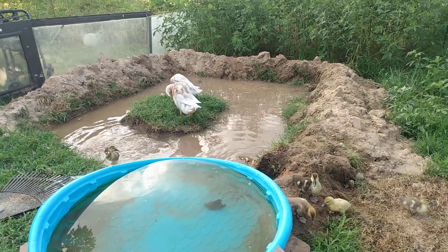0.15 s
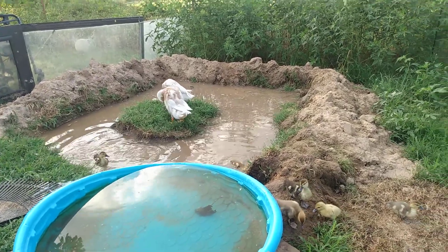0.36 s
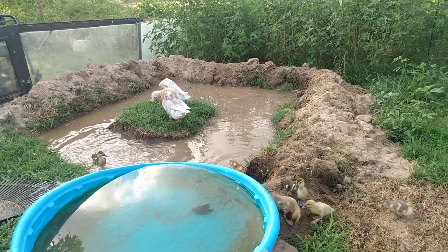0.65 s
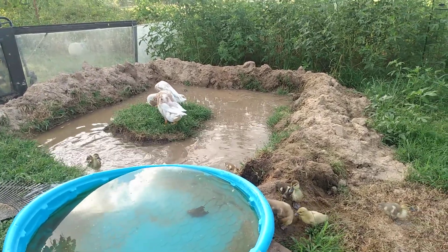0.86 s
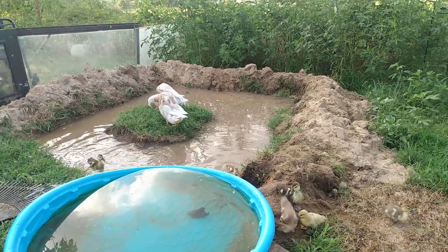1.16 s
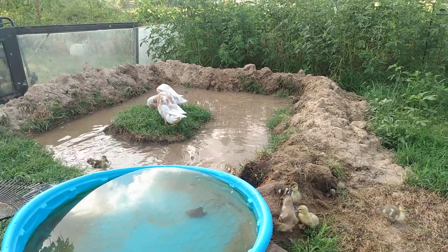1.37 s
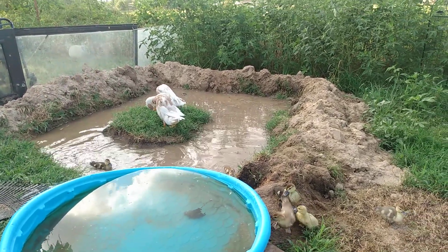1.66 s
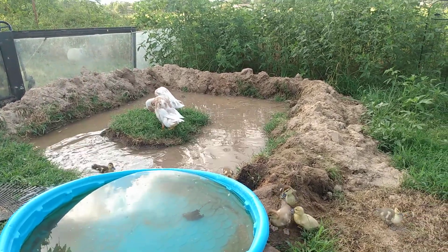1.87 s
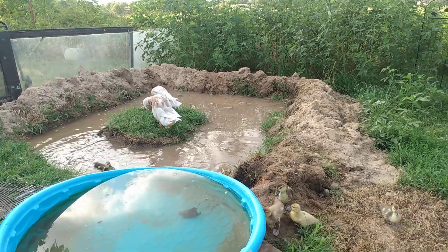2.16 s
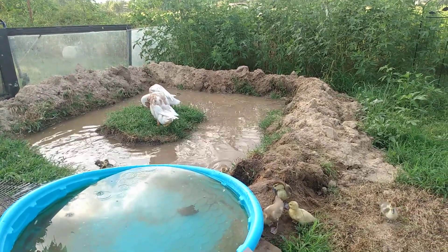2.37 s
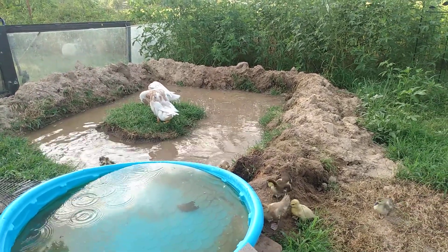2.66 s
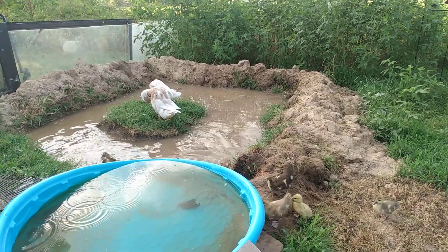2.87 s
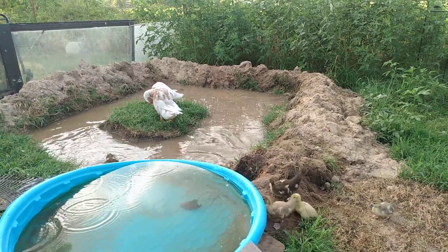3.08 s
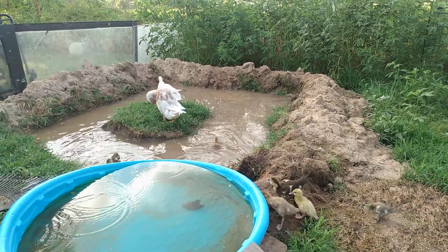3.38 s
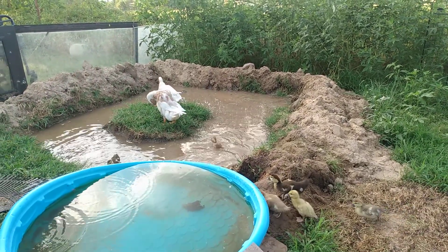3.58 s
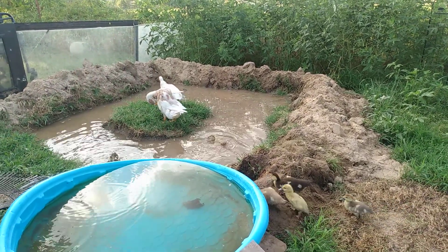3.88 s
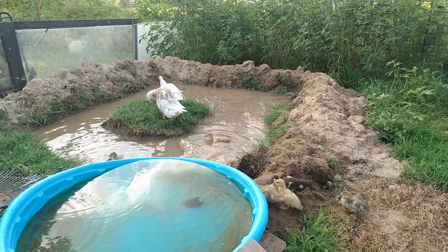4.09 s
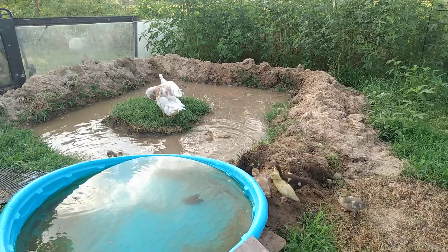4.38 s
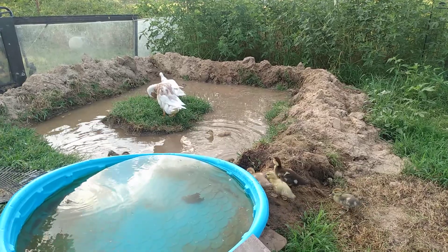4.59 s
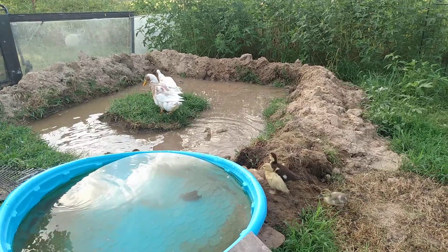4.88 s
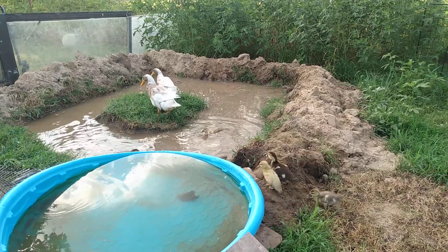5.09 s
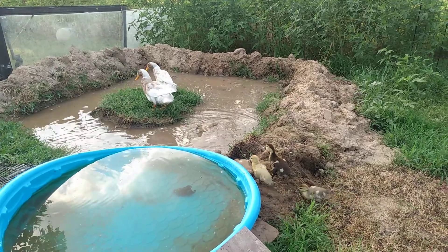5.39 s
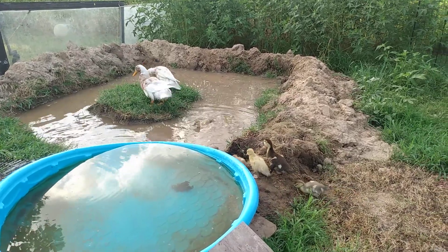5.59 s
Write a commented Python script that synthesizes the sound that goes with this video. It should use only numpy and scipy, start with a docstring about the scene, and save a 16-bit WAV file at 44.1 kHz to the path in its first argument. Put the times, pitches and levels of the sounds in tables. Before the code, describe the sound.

Ducklings dabble and peep softly in a dripping pond, with one close splash, a gusty rumble and crickets scraping nearby.

```python
"""A muddy backyard duck pond, heard on a small handheld stereo microphone.
Bubbles crackle, drip and gurgle under dabbling bills to the left, over a gusty low rumble and
a thin hiss of leaves. The water slops about and splashes once close by, with big ringing plops.
The hand bumps the case, two bush crickets scrape their wings in the weeds, and ducklings
whistle short peeps."""
import sys
import numpy as np
from scipy import signal
from scipy.fft import rfft, irfft
from scipy.io import wavfile
from scipy.ndimage import uniform_filter1d

SR = 44100
rng = np.random.default_rng(int(sys.argv[2]) if len(sys.argv) > 2 else 0)


def master_out(mix):
    """Clip the mix to full scale and print it as 16-bit PCM to the path in sys.argv[1]."""
    frames = np.transpose(np.atleast_2d(mix))
    ceiling = np.clip(frames, -1, 1)
    pcm = np.round(ceiling * 32767).astype(np.int16)
    wavfile.write(sys.argv[1], SR, pcm)


N = 253134
TIME = np.arange(N) / SR
HZ = np.fft.rfftfreq(N, 1 / SR)


def gain_of(db):
    """Decibels to amplitude."""
    return 10 ** (np.asarray(db) / 20)


def unit_rms(x):
    """Scales to an rms of one."""
    return x / np.sqrt(np.mean(x ** 2) + 1e-20)


def fader(curve):
    """A curve of (time [s], level [dB]) as a gain for every sample."""
    return gain_of(np.interp(TIME, *np.transpose(curve)))


def eq(x, curve):
    """Filters by a curve of (frequency [Hz], gain [dB])."""
    hz, db = np.transpose(curve)
    return irfft(rfft(x) * gain_of(np.interp(np.log(HZ + 1), np.log(hz + 1), db)), N)


def noise(spectrum):
    """Noise with a given spectrum in dB per Hz."""
    return eq(rng.standard_normal(N) * np.sqrt(SR / 2), spectrum)


def wander(rate_hz):
    """Smooth random drift of rms one."""
    return unit_rms(irfft(rfft(rng.standard_normal(N)) * np.exp(-(HZ / rate_hz) ** 2), N))


def resonance(f, hz, width):
    """Gain of a steep-sided resonance at the frequencies f."""
    return 1 / (1 + ((f - hz) / width) ** 2 * 2) ** 1.5


def band_drift(x, depth_db):
    """Lets every narrow band swell and sink on its own."""
    bands = signal.stft(x, nperseg=1024, noverlap=768)[2]
    drift = uniform_filter1d(rng.standard_normal(bands.shape[1:]), size=5, axis=0)
    drift = unit_rms(uniform_filter1d(drift, size=14, axis=1))
    return signal.istft(bands * gain_of(depth_db * drift), nperseg=1024, noverlap=768)[1][:, :N]


def add(mix, s, sound):
    """Lays a sound into the mix at s seconds."""
    part = mix[..., max(round(s * SR), 0):][..., :sound.shape[-1]]
    part += sound[..., :part.shape[-1]]


def panned(db):
    """Gains of the two microphone ports; pan is left minus right in dB."""
    return gain_of([[db / 2], [-db / 2]])


def from_left(x, lag_samples=11):
    """Sound from the left reaches the right port a moment later."""
    return np.array([x, np.roll(x, lag_samples)])


def wide_noise(spectrum, share):
    """A share of the noise comes from the left; the rest is unrelated at the two ports."""
    direct = np.sqrt(share) * from_left(noise(spectrum))
    return direct + np.sqrt(1 - share) * np.array([noise(spectrum), noise(spectrum)])


def bank_reverb(x, t60=.12):
    """The banks scatter a faint short tail, different at each port."""
    t = np.arange(SR // 5) / SR
    tail = rng.standard_normal((2, len(t))) * gain_of(-60 * t / t60) * (t > .002)
    return .35 * signal.fftconvolve(x[None], tail / np.linalg.norm(tail[0]), axes=1)[:, :N]


def bubble(hz, cycles):
    """A bubble swells for some cycles and rings out, rising a little in pitch."""
    turns = np.arange(SR // 16) / SR * hz
    age = turns / cycles
    return np.sin(2 * np.pi * turns * (1 + 0.008 * age)) * age * np.exp(1 - age)


def bubbling(low_hz, high_hz, cycles, per_s, spread_db, sizes):
    """Bubbles of many sizes burst at random, a few louder than the rest."""
    out = np.zeros(N)
    for hz in np.linspace(low_hz, high_hz, sizes):
        strength = gain_of(spread_db * np.minimum(rng.exponential(1, N), np.pi))
        births = rng.random(N) < per_s / sizes / SR
        ring = unit_rms(bubble(hz, cycles * 2 ** rng.uniform(-1, 1)))
        out += signal.oaconvolve(strength * births, ring)[:N]
    return unit_rms(out)


# tone of the outdoor rumble: (frequency [Hz], relative level [dB])
RUMBLE_TONE = [(15, -71), (25, -31), (40, -11.5), (67, 3.5), (97, 5.5), (161, -2), (197, -7.5), (245, -21),
               (313, -34), (420, -44), (550, -99), (920, -120)]
# gusts in the low end: (crest time [s], half length [s], boost [dB])
GUSTS = [(2.33, 0.29, 3.5), (2.84, 0.042, 1.5), (3.67, 0.1, 5), (4.232, 0.078, 6)]
def rumble(deep_db=-47.5, upper_db=-55.5, crossover_hz=125, buffet_db=1.5):
    """A buffeting low bed fades in fast; its bottom swells in gusts while its top keeps growing."""
    fade_in_db = -12.5 * np.exp(-TIME / 0.17)
    gusting_db = deep_db + sum(db * np.exp(-((TIME - s) / half) ** 2) for s, half, db in GUSTS)
    growing_db = upper_db + 1.5 * TIME
    lows = 1 / (1 + (HZ / crossover_hz) ** 8)
    out = np.zeros((2, N))
    for band, db, mono in ((lows, gusting_db, 1 / 4), (1 - lows, growing_db, 1 / 2)):
        centre, *sides = (unit_rms(irfft(rfft(noise(RUMBLE_TONE)) * np.sqrt(band), N)) for _ in range(3))
        out += gain_of(db + fade_in_db) * (np.sqrt(mono) * centre + np.sqrt(1 - mono) * np.array(sides))
    return out * gain_of(buffet_db * wander(22.6))


# hiss of leaves and far insects, and wash of the open yard: (frequency [Hz], level [dB per Hz])
HISS_TONE = [(2000, -130), (2800, -114), (4000, -103), (7000, -100), (9000, -95.5), (12000, -97.5),
             (14000, -99), (16000, -103)]
WASH_TONE = [(250, -110), (450, -111), (650, -107), (850, -113), (1200, -110), (1500, -114), (1800, -111),
             (2150, -110), (2500, -117), (3200, -113), (5000, -130)]
# their fader rides: (time [s], gain [dB])
HISS_RIDE = [(0, 5), (.9, 2), (2.5, 5), (5.1, 2)]
WASH_RIDE = [(.5, 3), (3, 0), (5.74, -4)]
def air():
    """Leaves and far insects hiss above a faint wavering wash that slowly dies down."""
    wash = band_drift(wide_noise(WASH_TONE, 1 / 2), depth_db=2.5)
    return wide_noise(HISS_TONE, 1 / 5) * fader(HISS_RIDE) + wash * fader(WASH_RIDE)


# fine fizz of trickling water: (frequency [Hz], level [dB per Hz])
FIZZ_TONE = [(1500, -125), (2800, -112), (3500, -103), (4200, -99), (6000, -104), (8000, -102),
             (11000, -109), (16000, -117)]
# how briskly the water crackles and tinkles: (time [s], relative level [dB])
FLOW = [(0, 5), (.5, 2.5), (1.05, 2.5), (1.5, 3), (2.25, 5), (2.85, 1), (4.25, 2.5), (4.85, -1.5), (5.1, 2),
        (5.74, 1)]
def crackle(patter_db=-65, spray_db=-61.5, clump_db=3):
    """Foam bursts in clumps of patter, bright spray and fizz; drips stir up the patter and fizz."""
    patter = bubbling(4310, 7090, cycles=2.8, per_s=450, spread_db=6, sizes=24)
    spray = bubbling(7500, 14000, cycles=.7, per_s=240, spread_db=4.3, sizes=8)
    clumps = unit_rms(fader(FLOW)) * gain_of(clump_db * wander(47))
    stir = flurries()
    pops = (gain_of(patter_db) * patter * stir + gain_of(spray_db) * spray) * clumps
    fizz = band_drift(wide_noise(FIZZ_TONE, 1 / 2), depth_db=2.4)
    return from_left(pops) + bank_reverb(pops) + fizz * clumps * stir


def tinkle(db=-67):
    """Tiny droplets fall back on the pond, each with a short clear pitch."""
    drops = bubbling(3690, 6917, cycles=9, per_s=130, spread_db=3, sizes=32)
    drops *= unit_rms(fader(FLOW)) * gain_of(db)
    return .7 * from_left(drops) + 2 * bank_reverb(drops)


# how hard the water laps at the bank: (time [s], level [dB])
LAPPING = [(0, -72.5), (.9, -84.5), (2.3, -72.5), (3.1, -79), (3.7, -73.5), (4.1, -72), (4.55, -77),
           (4.9, -77), (5.74, -86.5)]
def gurgle(small_db=-74.5, calm_db_per_s=1.3):
    """Large bubbles blend into soft lapping, under smaller ones that slowly calm."""
    small = bubbling(1100, 2700, cycles=14, per_s=170, spread_db=2.8, sizes=24)
    large = bubbling(450, 1280, cycles=6, per_s=130, spread_db=2.6, sizes=20)
    water = small * gain_of(small_db - calm_db_per_s * TIME) + large * fader(LAPPING)
    return .5 * from_left(water) + 2.5 * bank_reverb(water)


# pockets of water that gargle, and showers of droplets shaken from the bills:
# (crest time [s], half length [s], level [dB], pitch [Hz])
GARGLES = [(.06, 0.037, -71.5, 610), (.21, 0.023, -61, 673), (2.294, 0.043, -68, 650),
           (2.464, 0.041, -67, 2124), (2.73, 0.043, -72, 547), (3.154, 0.027, -69.5, 680),
           (3.242, 0.015, -68.5, 610), (3.83, 0.032, -69, 2110), (3.92, 0.082, -70.5, 1210),
           (3.967, 0.044, -69, 630), (4.146, 0.2, -73.5, 876), (4.205, 0.036, -70.5, 633),
           (4.31, 0.016, -70, 498), (4.471, 0.028, -65, 1200), (4.5, 0.06, -69, 1760),
           (4.449, 0.56, -78.5, 2150), (4.58, 0.076, -70, 954)]
SHOWERS = [(.155, 0.013, -62, 4900), (.25, 0.25, -66, 5340), (.3, .015, -63, 4050),
           (.512, 0.0089, -61.5, 4630), (.455, .018, -58, 4600), (.9, 0.14, -63, 5700),
           (1.35, 0.046, -66, 4200), (1.59, .025, -61, 4720), (2.43, 0.02, -59, 3580),
           (2.66, .03, -62.5, 3800), (2.86, 0.012, -63, 4360), (3.05, .09, -68, 4260),
           (3.55, 0.11, -64, 6550), (3.83, 0.033, -66, 4840), (4.22, 0.043, -62.5, 3700),
           (4.59, 0.013, -59, 5300), (5.14, 0.082, -61, 6500), (5.56, 0.019, -62, 4600),
           (5.68, 0.097, -61, 6150)]
def dabbling(runs, width_hz, bubbles_per_s):
    """A bill sets off runs of like-sized bubbles or droplets, each run ringing on its own pitch."""
    out, t = np.zeros(N), np.arange(-SR, SR) / SR
    f = np.fft.rfftfreq(len(t), 1 / SR)
    for s, half, db, hz in runs:
        births = rng.standard_normal(len(t)) * (rng.random(len(t)) < bubbles_per_s / SR)
        swarm = irfft(rfft(births) * resonance(f, hz, width_hz), len(t))
        swell = np.exp(-(t / half) ** 2)
        run = gain_of(db) * unit_rms(swarm * swell) * np.sqrt(np.mean(swell ** 2))
        add(out, s + t[0], run[s + t >= 0])
    return from_left(out) + bank_reverb(out)


# slops and spatters of water:
# (time [s], level [dB], pitch at the crest [Hz], width [Hz], attack [s], decay [s], pan [dB])
SPLASHES = [(.15, -58.5, 700, 200, 0.061, 0.047, -2), (.12, -70, 1750, 790, 0.1, 0.07, -7),
            (0.431, -66.5, 1320, 885, 0.0091, 0.12, -1), (1.16, -71, 1110, 475, 0.11, 0.31, 5),
            (1.249, -65.5, 1620, 640, .4, .15, 3), (1.743, -57.5, 1260, 560, 0.0063, 0.029, 2),
            (2.003, -55, 2090, 800, 0.0022, 0.018, -9.5), (2.002, -56.5, 2010, 1930, 0.0016, 0.16, -6),
            (2.047, -62.5, 970, 523, 0.0078, 0.15, -4), (2.094, -52, 650, 306, 0.0053, 0.038, -2),
            (2.119, -54.5, 1330, 220, 0.0097, 0.012, -11), (2.215, -59, 820, 665, 0.0066, 0.075, 0),
            (2.218, -60, 1940, 400, .002, 0.0091, -1), (2.38, -66, 810, 196, 0.079, 0.025, 0),
            (2.49, -64.5, 880, 148, 0.054, 0.072, 4), (2.559, -69.5, 395, 106, 0.0088, 0.12, 3),
            (3.82, -80, 1090, 400, 0.13, 0.7, 0), (3.751, -79, 2140, 705, 0.24, 0.81, 3)]
def splashes(bubbles_per_s=600, climb_octaves=.4, climb_s=.2):
    """Each slop is a swarm of bubbles that swells and dies; they shrink, so its pitch climbs."""
    out, t = np.zeros((2, N)), np.arange(SR) / SR
    f = np.fft.rfftfreq(len(t), 1 / SR)
    for s, db, hz, width, attack, decay, pan_db in SPLASHES:
        births = rng.choice([-1, 1], len(t)) * (rng.random(len(t)) < bubbles_per_s / SR)
        swarm = irfft(rfft(births) * resonance(f, hz, width), len(t))
        speed = 2 ** (climb_octaves * np.tanh((t - attack) / climb_s))
        swarm = np.interp(np.cumsum(speed) / SR % 1, t, swarm)  # varispeed on a one-second loop
        swell = np.minimum(t / attack, 1) * np.exp(-np.maximum(t - attack, 0) / decay)
        slop = gain_of(db) * unit_rms(swarm * swell) * np.sqrt(np.mean(swell ** 2))
        add(out, s, panned(pan_db) * (slop + 2 * bank_reverb(slop)[:, :len(t)]))
    return band_drift(out, depth_db=2.5)


# drips and bright pops of foam: (time [s], level [dB], pitch [Hz])
DRIPS = [(0.1528, -36, 5330), (0.2894, -42, 4295), (0.4216, -39, 4300), (0.504, -38, 5400),
         (0.5565, -46.5, 5550), (0.7404, -35.5, 4360), (0.753, -43, 4620), (0.786, -38.5, 6480),
         (1.4234, -43, 4780), (1.715, -46, 4200), (1.815, -40, 4940), (1.999, -37.5, 6700),
         (2.157, -46, 4180), (2.176, -32.5, 6500), (2.291, -48, 4730), (2.389, -45, 5700),
         (2.4032, -39, 4280), (2.474, -55, 7060), (2.695, -38, 6340), (3.112, -44, 4360),
         (3.323, -47, 6000), (3.4367, -33, 6460), (3.79, -44, 4700), (4.207, -38.5, 4800),
         (4.446, -66, 5990), (4.465, -35, 5770), (4.5131, -39, 6300), (4.978, -46, 4760),
         (5.041, -37.5, 6330), (5.4928, -35, 5600), (5.525, -52, 5200)]
def drips(spatter_db=-19, spatter_s=.005):
    """Each drip ticks sharply and throws a brief spatter."""
    out, t = np.zeros(N), np.arange(SR // 20) / SR
    for s, db, hz in DRIPS:
        tick = bubble(hz, cycles=1.6)
        spatter = unit_rms(signal.fftconvolve(rng.standard_normal(len(t)), tick)[:len(t)])
        spatter *= gain_of(spatter_db) * np.exp(-t / spatter_s)
        add(out, s + .001, gain_of(db) * (tick[:len(t)] + spatter))
    return from_left(out) + bank_reverb(out)


def flurries(doubling_db=-36, rise_s=0.018, fall_s=0.037):
    """Gain for the crackle: each drip stirs it up in proportion to its strength."""
    stir = np.ones(N)
    for s, db, _ in DRIPS:
        stir += gain_of(db - doubling_db) * np.exp(-np.maximum((s - TIME) / rise_s, (TIME - s) / fall_s))
    return unit_rms(stir)


# tone of the case's shudder: (frequency [Hz], relative level [dB])
SHUDDER_TONE = [(40, -14), (110, 12), (220, 0), (300, -8.5), (420, -17), (700, -82)]
# soft handling thumps: (crest time [s], level [dB], pitch [Hz], pan [dB])
BUMPS = [(0.315, -40.5, 131, 22.5), (0.552, -42.5, 137, 28.5), (0.667, -37.5, 110, -6.5),
         (1.205, -36.5, 116, 8), (1.341, -43, 97, -25), (2.044, -40, 172, 26), (2.062, -35.5, 96, 29),
         (2.162, -32, 96, -4), (2.403, -36, 114, 6), (2.458, -40, 145, 23), (2.537, -36, 121.2, 13),
         (2.818, -38, 151.4, -26), (2.89, -48, 176, -31), (3.141, -37, 152, 12), (3.225, -31, 117, -11.5),
         (3.657, -42, 155, -21), (3.837, -38, 140, -14), (5.558, -42, 128, -2)]
def bumps(cycles=0.45, shudder_db=-19, shudder_s=0.035):
    """The hand pushes the case in and lets it swing back with an uneven shudder, nearer one port."""
    out, t = np.zeros((2, N)), np.arange(-SR // 8, SR // 8) / SR
    shudder = unit_rms(noise(SHUDDER_TONE))
    shudder_swell = gain_of(shudder_db) * np.exp(np.minimum(2 * t, -t) / shudder_s)
    for s, db, hz, pan_db in BUMPS:
        push = np.sin(2 * np.pi * hz * t) * np.exp(-(t * hz / cycles) ** 2)
        push += np.roll(shudder, rng.integers(N))[:len(t)] * shudder_swell
        add(out, s + t[0], panned(pan_db) * gain_of(db) * push)
    return out


# wing resonances of the two bush crickets: (frequency [Hz], width [Hz], relative level [dB])
NEAR_WINGS = [(10290, 1600, 5), (11860, 930, -1), (8570, 320, -6.5), (14200, 3200, -10.5)]
FAR_WINGS = [(9000, 1200, -3), (9950, 440, -3), (10600, 1300, -3.5), (13800, 7200, -12.5)]
# their phrases: (start [s], stop [s], level [dB], attack [s])
NEAR_PHRASES = [(1.3, 2.915, -48.5, 1.27), (3.6, 4.47, -52, 0.38)]
FAR_PHRASES = [(2.8, 3.7, -53, 0.41)]
def cricket(phrases, wings, strokes_hz, right_db=-7, sharpness=2.3, release_s=0.017):
    """Each stroke scrapes a file and sets the wings ringing; phrases swell, hold and break off."""
    strokes = np.cumsum(strokes_hz * (1 + 0.0047 * wander(6.1))) / SR
    scrape = .3 + np.exp(-sharpness * (strokes % 1))
    body = np.sqrt(sum((gain_of(db) * resonance(HZ, hz, width)) ** 2 for hz, width, db in wings))
    direct, scatter = (unit_rms(irfft(rfft(scrape * rng.standard_normal(N)) * body, N)) for _ in range(2))
    buzz = from_left(direct)
    buzz[1] = gain_of(right_db) * unit_rms(buzz[1] + scatter)
    song = np.zeros(N)
    for start, stop, db, attack in phrases:
        swell = np.clip((TIME - start) / attack, 0, 1)
        song += gain_of(db) * swell * np.exp(-np.maximum(TIME - stop, 0) / release_s)
    return buzz * song


# duckling calls: (time [s], length [s], level [dB], top pitch [Hz], end pitch [Hz], pan [dB],
# reverb share [capped at 1])
PEEPS = [(1.666, 0.023, -56.5, 2845, 2610, -14, 0.2), (1.798, 0.049, -52.5, 3360, 2460, -6, 0.14),
         (1.998, 0.053, -51, 3410, 2460, -5, 0.14), (3.745, .03, -60.5, 2490, 2300, 0, 0.5),
         (3.979, 0.03, -60, 2990, 2600, 3, 0.9), (4.031, 0.026, -58.5, 2880, 2480, 0.5, 0.74),
         (4.711, 0.025, -67, 2710, 2560, -5, 0.6), (4.766, 0.033, -62, 2830, 2630, -5, 1.1),
         (5.424, 0.029, -65, 2550, 2400, -11, 0.4), (5.492, 0.033, -67.5, 2510, 2430, -6, 0.6)]
def peeps(crest=.22, arch_width=.38, roughness=.2, rough_hz=300):
    """A duckling's thin whistle arches up and slides down; far ones arrive mostly as reverb."""
    out = np.zeros((2, N))
    for s, length, db, top_hz, end_hz, pan_db, wet in PEEPS:
        progress = np.linspace(0, 1, round(length * SR))
        hz = end_hz + (top_hz - end_hz) * np.exp(-((progress - crest) / arch_width) ** 2)
        peep = gain_of(db) * np.sin(np.pi * progress ** .8) * np.sin(2 * np.pi * np.cumsum(hz) / SR)
        wet = min(wet, 1)
        add(out, s, panned(pan_db) * np.sqrt(1 - wet) * peep)
        add(out, s, panned(pan_db) * np.sqrt(wet) * 3 * bank_reverb(peep, t60=.25))
    return out * unit_rms(1 + roughness * wander(rough_hz))


# big bubbles inside the close splash: (time [s], level [dB], pitch [Hz], attack [cycles])
PLOPS = [(2.019, -50, 1410, 1.7), (2.028, -52, 1480, 2.7), (2.042, -35, 1087, 2.2), (2.052, -44, 1080, 2),
         (2.097, -52, 714, 2), (2.112, -50, 544, 1), (2.121, -48, 1345, 2.5), (2.129, -52, 1330, 3.5),
         (2.153, -46.5, 1050, 3.2), (2.228, -48.5, 580, 1.7)]
def plops(pan_db=-3):
    """Single big bubbles ring out a little to the right and scatter off the banks."""
    out = np.zeros(N)
    for s, db, hz, cycles in PLOPS:
        add(out, s, gain_of(db) * bubble(hz, cycles))
    return panned(pan_db) * (.75 * out + 1.7 * bank_reverb(out, t60=.09))


def wavering(x, crossover_hz=3300):
    """Narrow bands swell and sink at random, deeply in the midrange and gently in the treble."""
    mids = irfft(rfft(x) / (1 + (HZ / crossover_hz) ** 12), N)
    return gain_of(-1) * band_drift(x - mids, depth_db=2) + gain_of(-2) * band_drift(mids, depth_db=5)


# stretches where the mids sound hollow: (start [s], stop [s], centre [Hz], half width [Hz], gain [dB])
SCOOPS = [(-.3, 1.26, 2430, 264, -13), (2.3, 3.4, 1430, 150, -9.5), (2.3, 4.95, 3630, 131, -2),
          (4.75, 5.9, 1580, 199, -2.5)]
def scooped(x, fade_s=0.052):
    """Fades notches in and out of the midrange."""
    hz, t, bands = signal.stft(x, SR, nperseg=1024, noverlap=768)
    for start, stop, centre, half, db in SCOOPS:
        held = (np.tanh((t - start) / fade_s) - np.tanh((t - stop) / fade_s)) / 2
        bands *= gain_of(db * np.exp(-((hz[:, None] - centre) / half) ** 2) * held)
    return signal.istft(bands, SR, nperseg=1024, noverlap=768)[1][:, :N]


# each port's colour for sound from the left: (frequency [Hz], gain [dB])
LEFT_EQ = [(300, -15), (520, -2.5), (1000, -1), (1900, -1), (2130, 5.5), (2400, 1), (2800, 3.5),
           (3100, 6.5), (3450, -3), (3900, 0), (6400, 0), (8500, -1)]
RIGHT_EQ = [(100, -20), (600, 5.5), (950, -5), (1700, 2.5), (2200, -2.5), (2600, 3), (3000, -13), (3400, 0),
            (4300, -1), (5300, 2.5), (5800, 6.5), (6400, 6), (6900, -1.5), (7600, -15), (8300, -38),
            (10500, -30.5), (16000, -22)]
def scene():
    """Water and air from the left take on each port's colour; the other layers go in over them."""
    gargles = dabbling(GARGLES, width_hz=77, bubbles_per_s=290)
    showers = dabbling(SHOWERS, width_hz=450, bubbles_per_s=170)
    left, right = wavering(air() + crackle() + tinkle() + gurgle()) + drips() + gargles + showers
    bed = np.array([eq(left, LEFT_EQ), eq(right, RIGHT_EQ)])
    pond = scooped(bed + splashes()) + plops()
    near_cricket = cricket(NEAR_PHRASES, NEAR_WINGS, strokes_hz=124)
    far_cricket = cricket(FAR_PHRASES, FAR_WINGS, strokes_hz=118)
    return pond + peeps() + near_cricket + far_cricket + rumble() + bumps()


def record(dry):
    """The recorder cuts the top end steeply at 15.8 kHz."""
    lowpass = signal.firwin(801, 15800, window=("kaiser", 9), fs=SR)
    return signal.oaconvolve(dry, lowpass[None], "same", axes=1)


dry = scene()
out = record(dry)
master_out(out)
```